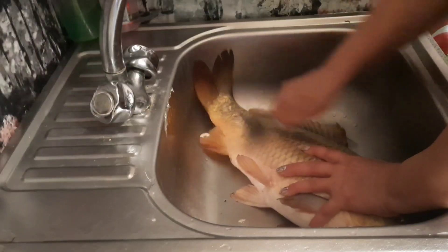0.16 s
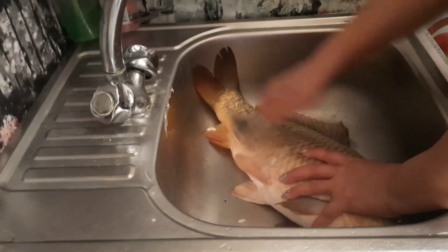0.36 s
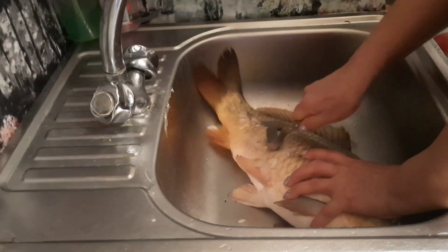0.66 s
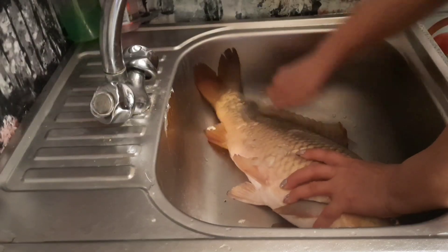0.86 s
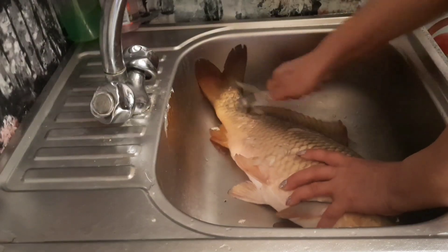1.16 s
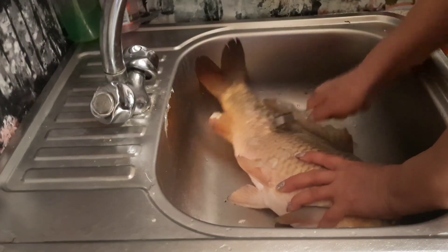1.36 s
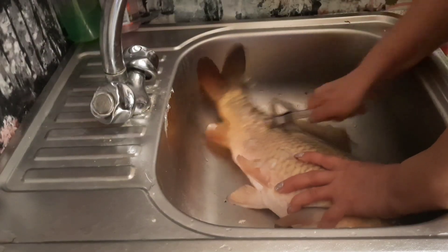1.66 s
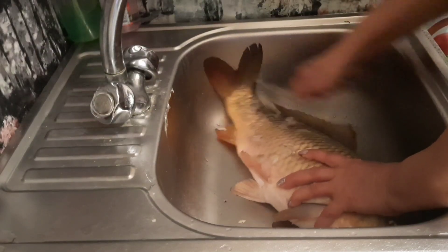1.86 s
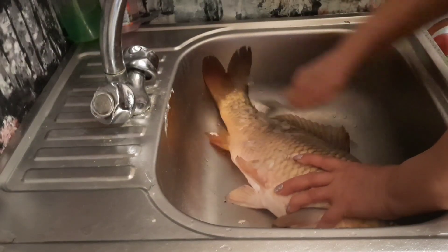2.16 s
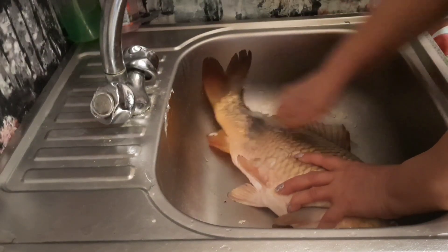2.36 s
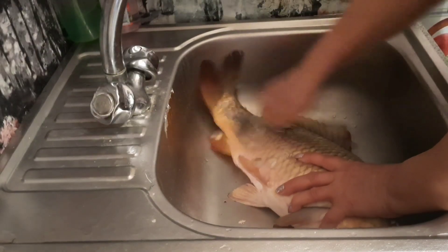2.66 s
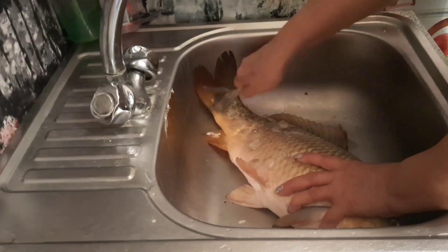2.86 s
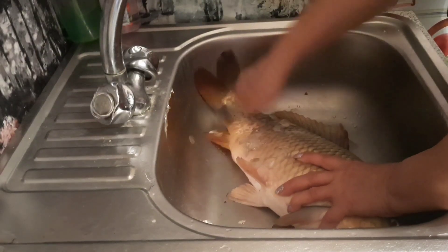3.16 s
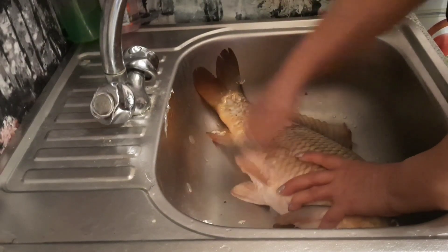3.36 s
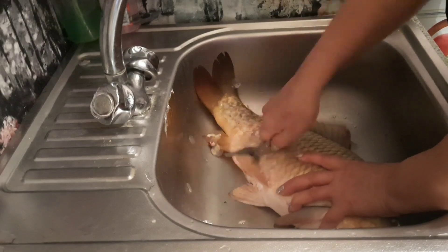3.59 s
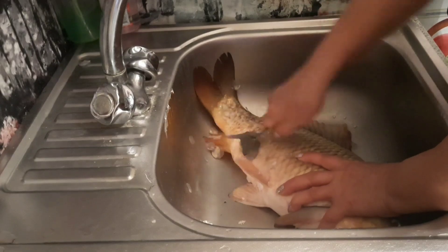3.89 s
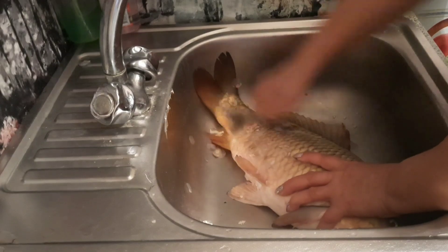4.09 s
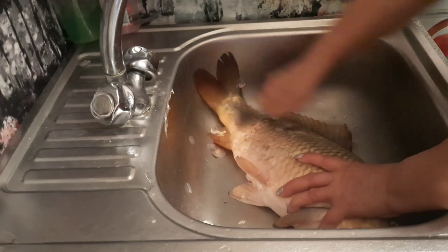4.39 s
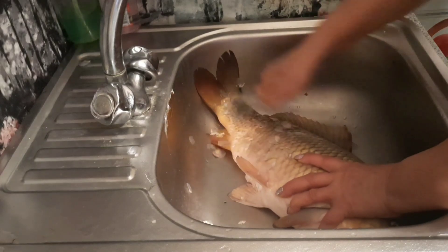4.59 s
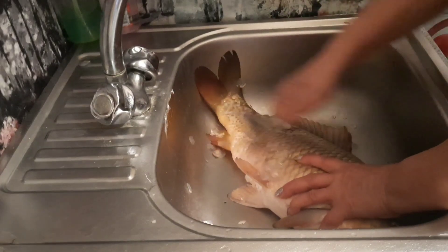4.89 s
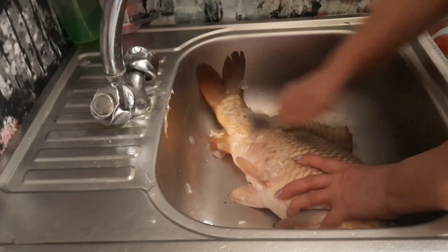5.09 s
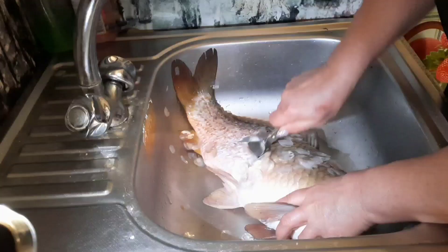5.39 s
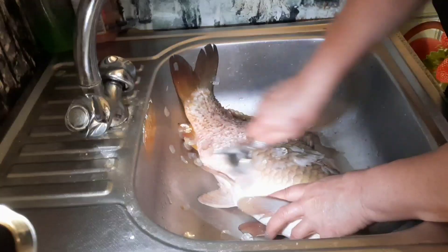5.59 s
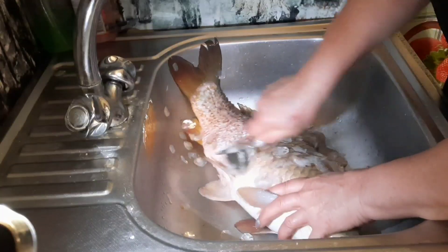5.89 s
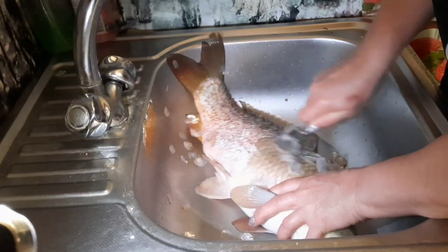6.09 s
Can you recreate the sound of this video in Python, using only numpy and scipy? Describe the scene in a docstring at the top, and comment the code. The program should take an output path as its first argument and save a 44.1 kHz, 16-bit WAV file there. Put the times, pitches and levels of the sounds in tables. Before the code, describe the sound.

Rapid, crisp rasps of a blade scaling a fish, while the metal sink beneath drums softly and takes one hard knock.

```python
"""A knife scrapes the scales off a carp lying in a steel kitchen sink, about three strokes a second.
Each stroke is a dense crackle, the sum of many impulses from lifting scales. The blade trips over their
rows, and this nearly periodic force drives the resonances of the basin through the fish. Single scales
snap, the blade taps down between strokes, and one hard knock sets the steel wall into free vibration.
A small kitchen adds short reverberation, a low rumble and a faint hum."""
import sys
import numpy as np
from scipy import signal
from scipy.fft import rfft, irfft
from scipy.io import wavfile
from scipy.ndimage import uniform_filter1d

SR = 44100
rng = np.random.default_rng(int(sys.argv[2]) if len(sys.argv) > 2 else 0)


def to_wav(s):
    """Save 16-bit WAV."""
    ch = np.atleast_2d(s).T  # columns
    pcm = np.round(np.clip(ch, -1, 1) * 32767)  # PCM
    wavfile.write(sys.argv[1], SR, pcm.astype(np.int16))


N = 275625
T = np.arange(N) / SR


# Knife strokes: start_s, swell_s, length_s, tug_s, level_db, dry_db, wet_db, rasp_hz, basin_db,
# floor_db, wall_db. Full pressure comes swell_s after the start, the hardest tug tug_s after it;
# dry_db (crackle treble) and wet_db (rasp) are relative to level_db.
STROKE_TABLE = [ (0.132, 0.04, 0.14, .035, -30, -3.5, -11.5, 1750, -30, -31.5, -39),
                (0.303, 0.023, 0.028, 0.005, -46, -3, -8, 2920, -44, -36, -41.5),
                (0.522, 0.03, 0.069, 0.024, -28.5, -1.5, -13, 4150, -18.5, -31.5, -35),
                (0.614, .03, 0.057, 0.023, -28.5, -2.5, -1.5, 2640, -42, -32.5, -37),
                (0.887, 0.054, 0.084, 0.032, -28.5, -3.5, -10, 4000, -27, -36, -38.5),
                (1.018, .012, 0.016, 0.028, -33.5, -6, -14, 1500, -53, -36.5, -41),
                (1.2452, 0.012, 0.088, 0.023, -27, -3.5, -23, 3630, -29, -32.5, -39),
                (1.598, 0.0042, 0.077, 0.022, -31.5, -3.5, -14, 2800, -26, -36, -38),
                (1.985, 0.071, 0.13, .05, -28.5, -5.5, -13, 4970, -22, -30, -32.5),
                (2.334, 0.055, 0.11, 0.032, -30, -4, -14.5, 3020, -25, -36, -37),
                (2.641, 0.06, 0.095, 0.023, -30, -2, -2, 2860, -24.5, -31.5, -44),
                (2.932, 0.05, 0.076, 0.03, -27, -3, -7.5, 2880, -26.5, -31, -34.5),
                (3.204, 0.043, 0.062, 0.023, -29, -2.5, -11, 2920, -27, -29, -34),
                (3.518, 0.036, .084, .021, -27.5, -2, -21, 5990, -27, -29, -27.5),
                (3.805, 0.052, 0.083, 0.024, -28, -2, -4, 2800, -23, -29, -32),
                (4.107, 0.055, 0.079, 0.014, -28, -3, -5.5, 2890, -26.5, -23, -29.5),
                (4.408, 0.051, 0.087, 0.023, -26.5, -5.5, -7, 5025, -21.5, -36.5, -27.5),
                (4.719, 0.061, 0.097, 0.026, -26, -5, -8, 4640, -25, -26.5, -29.5),
                (5.065, 0.083, 0.071, 0.037, -23, -5.5, -11.5, 2640, -18, -28, -27),
                (5.392, 0.029, 0.029, 0.0062, -41.5, -7, -4.5, 2210, -55, -42.5, -42.5),
                (5.603, 0.079, 0.064, 0.038, -29, -4.5, 0, 2690, -40, -34.5, -30),
                (5.926, 0.095, 0.11, 0.022, -30, -3.5, -4.5, 2690, -46.5, -33.5, -31.5)]
# The blade brushing the skin on its way back: start_s, length_s, level_db
RETURN_BRUSHES = [(0, 0.0091, -49), (0.05, 0.0067, -50), (0.452, .04, -62.5), (1.12, 0.026, -51.5),
                  (1.46, 0.061, -55), (1.854, 0.088, -59.5), (2.566, 0.031, -63), (3.755, 0.016, -63),
                  (4.048, 0.01, -53.5), (5.02, 0.024, -54), (5.484, 0.15, -63.5), (5.8, 0.075, -56),
                  (6.12, 0.13, -61)]

def blade_pressure(lift_s=0.016, lift_db=6, rasp_lift_db=4, tail_db_per_s=135):
    """Contact force sets amplitude: envelopes of the crackle, its dry treble and each stroke's rasp."""
    crackle, treble, rasps = [], [], []
    for start, swell_s, length, _, db, dry_db, wet_db, rasp_hz, *_ in STROKE_TABLE:
        lifted = np.minimum(past(start + length) / lift_s, 1)
        release = -lift_db * lifted - tail_db_per_s * past(start + length)
        force_db = db + bite(start, swell_s) + swell(start + swell_s, db_per_s=(142.5, 113)) + release
        crackle.append(force_db)
        treble.append(force_db + dry_db)
        # the wet rasp needs pressure, so it drops further as the blade lifts
        rasps.append((rasp_hz, power_sum([force_db + wet_db - rasp_lift_db * lifted])))
    for start, length, db in RETURN_BRUSHES:
        force_db = db - 1500 * until(start) - 354 * past(start + length)  # slopes in dB per s
        crackle.append(force_db)
        treble.append(force_db - 3.5)
    return power_sum(crackle), power_sum(treble), rasps


def bite(start, swell_s, rise_db=30):
    """Attack transient in dB as the edge digs in: the sooner full pressure comes, the steeper it is."""
    return -rise_db * until(start) / (0.011 + 0.66 * swell_s)


# Spectral density of the crackle: frequency_hz, level_db
CRACKLE_SPECTRUM = [(300, 6), (600, -10), (850, 0), (1100, -0.5), (1700, -0.5), (2800, 4), (4000, 3.5),
                    (6000, 5), (8000, 0), (9700, -17.5), (12500, 51), (16000, -7)]

def scraping(count=14000, echo_s=0.0028, rasp_db=9, rasp_width_hz=480):
    """Superposition of random impulses: scale edges flick off the blade and merge into a crackle."""
    force, treble_force, rasps = blade_pressure()
    times = rng.uniform(0, N / SR, count)
    sizes = undb(2.5 * np.minimum(rng.exponential(size=count), 5.5)) * rng.choice([-1, 1], count)
    # each scale sits at another spot, so its reflections in the bowl have their own delays
    delays = echo_s * rng.exponential(size=(2, 5, count))
    path_gains = undb(3) * rng.standard_normal(delays.shape)
    delays[:, 0], path_gains[:, 0] = 0, 1  # the direct path

    def clicks(hz, width):
        strengths = sizes * undb(4 * rng.standard_normal(count))
        sides = np.array([pulses((times + delay).ravel(), (strengths * gain).ravel())
                          for delay, gain in zip(delays, path_gains)])
        return unit(double_band(sides, hz, width))

    body, treble = 0, 0
    for hz in np.geomspace(500, 14000, 16):
        part = clicks(hz, hz / 3) * gain_at(CRACKLE_SPECTRUM, hz) * np.sqrt(hz)
        part *= undb(3.5 * wander(per_s=32))  # the colour shifts as the edge meets new scales
        if hz < SR / 5:
            body += part
        else:
            treble += part
    # wet scales rasp in a narrow band whose pitch depends on the spot
    grain = steady(clicks(3250, 6000), 0.024)
    rasp = undb(rasp_db) * sum(double_band(grain * wet, hz, rasp_width_hz) for hz, wet in rasps)
    crackle = force * steady(body, 0.047) + undb(2.5) * treble_force * steady(treble, 0.043)
    crackle -= band(crackle, 9660, 500)  # a narrow spectral notch
    stick_slip_db = 2.3 * wander(per_s=70)  # the edge catches and slips within a stroke
    return (crackle + rasp) * undb(2 + stick_slip_db)


# Scales that snap off: start_s, level_db, pitch_hz
SCALE_SNAPS = [(0.1306, -20.5, 4060), (0.1476, -16, 3700), (0.193, -10.5, 6200), (0.5195, -15, 5860),
               (0.547, -21, 5800), (0.638, -22, 3000), (0.6617, -23, 2540), (0.878, -21.5, 4500),
               (0.9293, -25, 3940), (0.9533, -13.5, 3580), (1.036, -17, 4240), (1.2419, -12, 5940),
               (1.2456, -16, 3750), (1.6038, -15, 5910), (2.0108, -16, 8000), (2.0352, -9, 7800),
               (2.045, -17, 9000), (2.1091, -15, 4770), (2.4078, -14, 7450), (2.625, -25.5, 5800),
               (2.6741, -8, 6100), (2.7005, -15.5, 3200), (3.2012, -20.5, 7660), (3.4995, -28.5, 6100),
               (3.5275, -8, 6090), (3.844, -14, 5500), (4.173, -25, 2900), (4.704, -24.5, 12500),
               (4.809, -10, 4050), (4.8125, -24, 4700), (5.139, -14.5, 1730), (5.9386, -19.5, 2565)]

def snaps(level_db=17, broad_db=-6):
    """Sudden release of strain: a large scale tears loose with a bright crack around its own pitch."""
    out = np.zeros((2, N))
    for start, db, hz in SCALE_SNAPS:
        click = contact(t60=0.048, echo_db=9)
        crack = band(click, hz, hz / 2) + undb(broad_db) * band(click, 5300, 4400)
        add(out, start, undb(db + level_db) * crack / np.linalg.norm(crack))
    return out


# The blade touching down: start_s, level_db, pitch_hz, brightness_db
BLADE_TAPS = [(1.0178, -27, 2500, -6), (1.1112, -18, 1990, -6), (1.5232, -12.5, 2010, -18),
              (1.7453, -43.5, 2800, 9.5), (3.1504, -12.5, 2020, -16.5), (4.6553, -39, 1780, 0),
              (4.999, -11, 1968, -16), (5.3501, -23, 2230, -12), (5.783, -20, 2453, -12)]
# Resonances of the blade in contact: frequency_hz, width_hz, level_db
BLADE_MODES = [(3680, 4700, 3), (5540, 1100, 3.5), (12500, 1300, -4)]

def taps(level_db=18, edge_db=4, width_hz=560):
    """Damped impact: the blade lands on the fish with a dry knock, pitched by the spot, and a tick."""
    out = np.zeros((2, N))
    for start, db, hz, brightness_db in BLADE_TAPS:
        touch = contact(t60=0.046, echo_db=6)
        thud = band(band(touch, hz, 3 * width_hz), hz, width_hz)
        tick = undb(edge_db + brightness_db) * resonate(touch, BLADE_MODES)
        add(out, start, undb(db + level_db) * (thud + tick))
    return out


# The blade flicking free of the fish: start_s, level_db
BLADE_FLICKS = [(.303, -68), (.326, -59), (3.655, -62.5)]
# Modes of the free blade: frequency_hz, level_db
FREE_BLADE_MODES = [(6500, 22), (8100, 16), (10050, 15), (14100, 19)]

def flicks(t60=0.091):
    """Free vibration: let go for a moment, the thin blade rings high and faint."""
    starts, levels_db = np.transpose(BLADE_FLICKS)
    tone = sum(undb(db) * fade(t60) * np.sin(2 * np.pi * hz * T[:SR]) for hz, db in FREE_BLADE_MODES)
    return convolve(pulses(starts, undb(levels_db)), tone)


# The fish shifting under the holding hand and nudging the basin: peak_s, level_db
FISH_SHIFTS = [(.01, -42), (.212, -31.5), (1.125, -41), (1.555, -39), (1.875, -46.5), (2.189, -35.5),
               (2.74, -28), (3.019, -30), (4.53, -55), (5.001, -41), (5.5, -45), (5.725, -40)]

def push_on_sink(floor_peak_share=0.8):
    """Force transmission through the fish: envelopes of the basin, its floor and its walls."""
    basin, floor, walls = [], [], []
    for start, swell_s, length, tug_s, *_, basin_db, floor_db, wall_db in STROKE_TABLE:
        grip = bite(start, swell_s)
        basin.append(basin_db + grip + swell(start + tug_s, db_per_s=(410, 325), round_s=0.017))
        floor.append(floor_db + grip + swell(start + floor_peak_share * length, db_per_s=(79, 157)))
        walls.append(wall_db + grip + swell(start + tug_s, db_per_s=(490, 164)))
    for peak_s, db in FISH_SHIFTS:
        nudge = db + swell(peak_s, db_per_s=(270, 440))
        basin.append(nudge)
        floor.append(nudge - 7)
        walls.append(nudge - 10.5)
    return power_sum(basin), power_sum(floor), power_sum(walls)


# Speed of the blade over the rows of scales: time_s, rows_per_s
ROW_SPEED = [(.15, 146), (.55, 144.4), (2.04, 145), (2.38, 137), (2.97, 133), (3.24, 169), (3.83, 138),
             (4.13, 131), (4.44, 145), (4.75, 169), (5.12, 156), (5.96, 124)]
# Resonances of the sink floor: frequency_hz, width_hz, level_db
SINK_FLOOR_MODES = [(66.9, 8.1, -1.5), (93, 28, -10.5)]
# Resonances of the sink walls: frequency_hz, width_hz, level_db
SINK_WALL_MODES = [(204, 49, -4.5), (316, 15, 2.5), (348.7, 24, 5.5), (414, 7.8, -19), (500, 26, -19)]

def drumming(rows=1400, irregularity=0.037, basin_hz=151.7, upper_hz=226):
    """Forced vibration: the blade trips over rows of scales and the tugs drive the sink's modes."""
    on_basin, on_floor, on_walls = push_on_sink()
    jitter, strength, speed_noise = rng.standard_normal((rows, 3)).T
    drift = np.sqrt(8) * uniform_filter1d(speed_noise, size=8)  # hand speed drifts over a few rows
    gaps = np.exp(irregularity * (jitter + drift))
    rows_crossed = np.cumsum(np.interp(T, *np.transpose(ROW_SPEED))) / SR
    tug_times = np.interp(np.cumsum(gaps), rows_crossed, T, right=N / SR + 1)
    tugs = pulses(tug_times, undb(3.5 * strength))
    main_mode = double_band(tugs, basin_hz, 44.4)  # damped by the fish
    # the fish's body slips as well and excites the basin's next mode
    upper_mode = double_band(rng.standard_normal(N), upper_hz, 78)
    basin = unit(main_mode) + undb(-13) * unit(upper_mode)
    # the floor moves as one, the walls partly against each other
    floor = band(resonate(rng.standard_normal(N), SINK_FLOOR_MODES), 106, 61)
    mid, side = rng.standard_normal((2, N))
    rub = stereo(mid, undb(-6) * side)
    walls = double_band(resonate(rub, SINK_WALL_MODES), 304, 400)
    return (steady(basin, 0.0433) * on_basin * undb(1.1)
            + steady(floor, 0.043) * on_floor * undb(1.03)
            + steady(walls, 0.039) * on_walls * undb(-1.7))


# Blows on the sink wall: a light one, then a hard knock made of three blows in quick succession, the second the
# strongest: start_s, level_db
WALL_KNOCKS = [(0.204, -19), (1.922, -7), (1.9248, 6.5), (1.9321, -10.5)]
# Free modes of the steel wall: frequency_hz, level_db, t60_s
STEEL_MODES = [(302.3, -21.5, 0.44), (357, -0.5, 0.11), (409, -6.5, 0.27), (483.8, 1.5, 0.22),
               (850, -7, 0.23), (1175, -15, 0.17), (1330, -15, 0.12), (1576, -5, .15), (1770, -18, 0.21),
               (1910, -20, 0.1), (2160, -9, 0.049), (2700, -36, 0.084)]

def knocks(ring_db=-18, crack_db=10, clatter_db=9, phase_rad=0.58):
    """Impulse response of a plate: a blow rings the steel, with a crack and a clatter of dense modes."""
    starts, levels_db = np.transpose(WALL_KNOCKS)
    # the panel reaches the two sides out of phase; neighbouring modes swing opposite ways
    lead = phase_rad * np.array([[1], [-1]])
    wall = 0
    for k, (hz, db, t60) in enumerate(STEEL_MODES):
        sign = (-1) ** k
        wall += sign * undb(db) * fade(t60) * np.sin(2 * np.pi * hz * T[:SR] + sign * lead)
    crack = undb(crack_db) * band(contact(t60=0.028, echo_db=1), 2300, 5600)
    clatter = undb(clatter_db) * band(contact(t60=0.18, echo_db=61), 1150, 1900)
    blows = pulses(starts, undb(levels_db))
    return undb(ring_db) * convolve(blows, wall) + convolve(blows, crack + clatter)


def kitchen(sides, room_db=-11, t60=0.25, build_s=0.015, band_hz=(250, 9000)):
    """Reverberation: diffuse reflections build up and decay exponentially on each side."""
    tails = rng.standard_normal((2, SR)) * fade(t60) * (1 - fade(build_s))
    tails = butterworth(tails, 1, band_hz, "band")
    return sides + undb(room_db) * convolve(sides, tails / np.linalg.norm(tails[0]))


# Spectral density of the kitchen's background: frequency_hz, level_db
ROOM_SPECTRUM = [(25, -38), (65, -4), (140, -7), (240, -11), (330, -5.5), (520, -14.5), (1100, -24),
                 (3000, -29), (8000, -36.5), (16000, -36)]

def background(rumble_db=-55, hum_hz=315, hum_db=-57):
    """Ambient noise: a broadband rumble, and a narrow band heard as a faint wavering hum."""
    mid, side = rng.standard_normal((2, N))
    noise = stereo(mid, butterworth(side, 1, 500, "high"))
    rumble = unit(irfft(rfft(noise) * gain_at(ROOM_SPECTRUM, np.fft.rfftfreq(N, 1 / SR)), N))
    hum = steady(double_band(rng.standard_normal(N), hum_hz, 11.6), 0.13)
    return undb(rumble_db) * rumble + undb(hum_db) * hum


def contact(t60, echo_db):
    """Early reflections: a click and its echoes in the bowl, different on each side; energy near 1."""
    echoes = rng.standard_normal((2, SR // 10)) * fade(t60)[:SR // 10]
    sides = undb(echo_db) * echoes / np.linalg.norm(echoes, axis=1, keepdims=True)
    sides[:, 0] += 1
    return sides / np.sqrt(1 + undb(2 * echo_db))


def band(x, hz, width_hz):
    """A second-order resonance, gain 1 at its centre."""
    return signal.lfilter(*signal.iirpeak(hz, hz / width_hz, fs=SR), x)


def double_band(x, hz, width_hz):
    """Two equal resonances in cascade: a narrower peak with steeper skirts."""
    return band(band(x, hz, width_hz), hz, width_hz)


def resonate(x, modes):
    """Modal superposition: a body responds with the sum of its resonances."""
    return sum(undb(db) * band(x, hz, width) for hz, width, db in modes)


def butterworth(x, order, hz, kind):
    """A filter with a maximally flat passband."""
    return signal.sosfilt(signal.butter(order, hz, kind, fs=SR, output="sos"), x)


def convolve(x, response):
    """Pass a sound through an impulse response; either may have two sides."""
    return signal.fftconvolve(np.atleast_2d(x), np.atleast_2d(response), axes=1)[:, :N]


def gain_at(spectrum, hz):
    """Gain of a spectrum, interpolated in dB over log frequency."""
    frequencies, db = np.transpose(spectrum)
    return undb(np.interp(np.log(hz + 1), np.log(frequencies), db))


def pulses(times, sizes):
    """Impulses at the given times."""
    return np.bincount((times * SR).astype(int), sizes, N)[:N]


def add(out, start_s, sound):
    """Superpose a short sound at its time."""
    start = int(start_s * SR)
    part = sound[:, :N - start]
    out[:, start:start + part.shape[1]] += part


def fade(t60):
    """One second of exponential decay, 60 dB in t60 seconds."""
    return np.exp(-np.log(1000) * T[:SR] / t60)


def swell(peak_s, db_per_s, round_s=0):
    """A level in dB with (rise, fall) slopes about a peak of 0, rounded over round_s."""
    away = np.sqrt((T - peak_s) ** 2 + round_s ** 2) - round_s
    return -np.where(T < peak_s, *db_per_s) * away


def wander(per_s):
    """A continuous random drift with a spread near 1."""
    knots = np.arange(0, N / SR + 1, 1 / per_s)
    return 1.2 * np.interp(T, knots, rng.standard_normal(1024)[:len(knots)])


def past(s):
    """Seconds since a moment; zero before it."""
    return np.maximum(T - s, 0)


def until(s):
    """Seconds left to a moment; zero after it."""
    return np.maximum(s - T, 0)


def power_sum(levels_db):
    """Incoherent addition: the joint gain of overlapping level curves."""
    return np.sqrt(sum(10 ** (np.maximum(db, -120) / 10) for db in levels_db))


def steady(x, seconds):
    """Divide by the running rms: slow swells even out, the fine grain stays."""
    return x / np.sqrt(np.abs(uniform_filter1d(x ** 2, int(seconds * SR) + 1)) + 1e-12)


def unit(x):
    """Scale to rms 1."""
    return x / np.sqrt(np.mean(x ** 2))


def undb(db):
    """Decibels to gain."""
    return 10 ** (np.asarray(db) / 20)


def stereo(mid, side):
    """Left and right as sum and difference."""
    return np.array([mid + side, mid - side])


def pan(db):
    """Left and right gains for a left-minus-right level."""
    return undb(np.array([[db], [-db]]) / 2)


def scene():
    """Level differences place the blade near the middle and the basin a little to the left."""
    blade = scraping() + snaps() + taps() + flicks()
    basin = drumming() + knocks()
    return kitchen(blade * pan(db=0.93) + basin * pan(db=1.5)) + background()


def record(dry):
    """Band limiting: the microphone thins the deepest bass, clips at full scale and cuts the top."""
    clipped = np.clip(butterworth(dry, 3, 42, "high"), -1, 1)
    return signal.sosfilt(signal.ellip(10, 0.2, 70, 16000, fs=SR, output="sos"), clipped)


dry = scene()
out = record(dry)
to_wav(out)
```